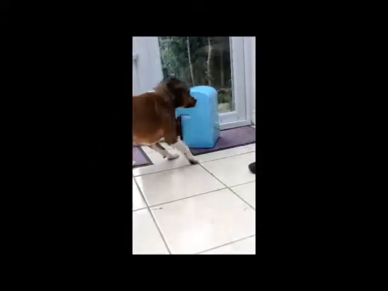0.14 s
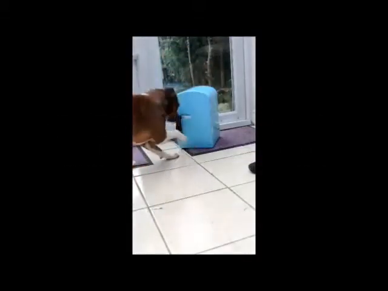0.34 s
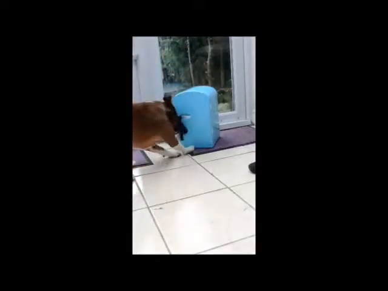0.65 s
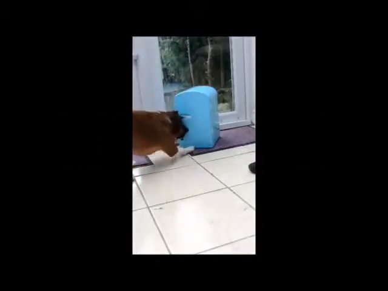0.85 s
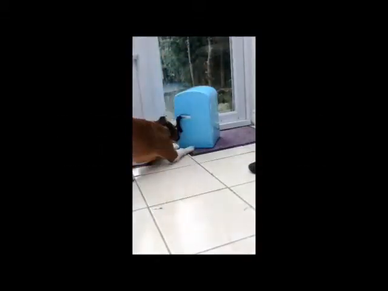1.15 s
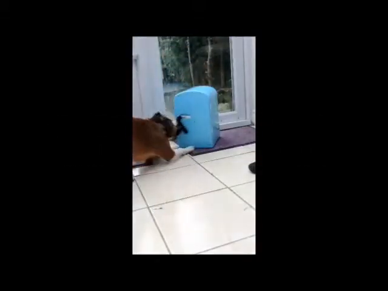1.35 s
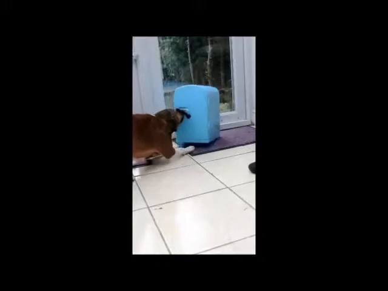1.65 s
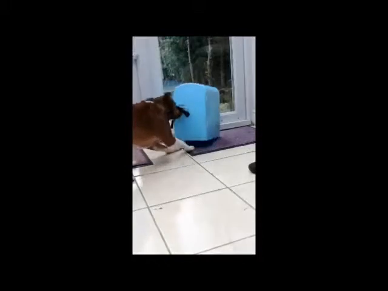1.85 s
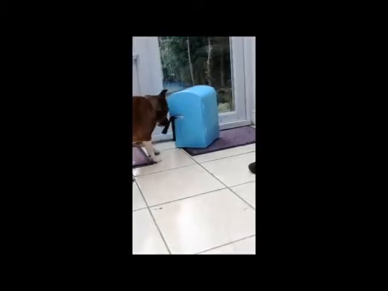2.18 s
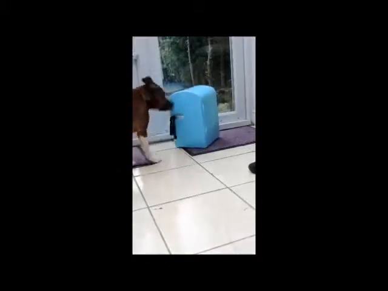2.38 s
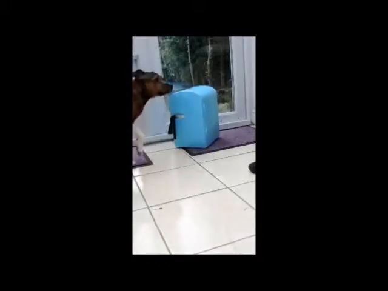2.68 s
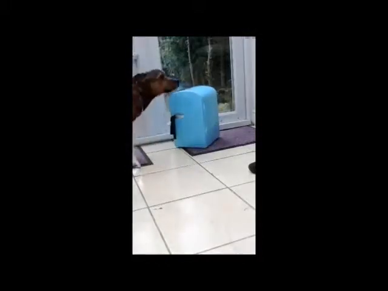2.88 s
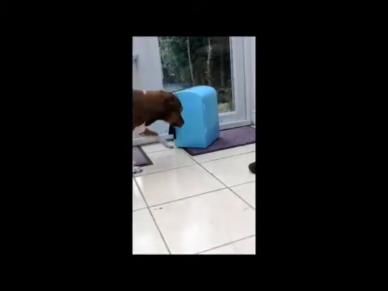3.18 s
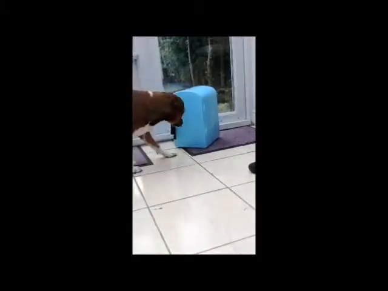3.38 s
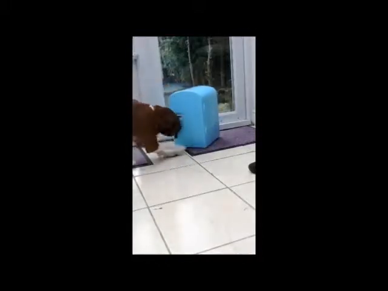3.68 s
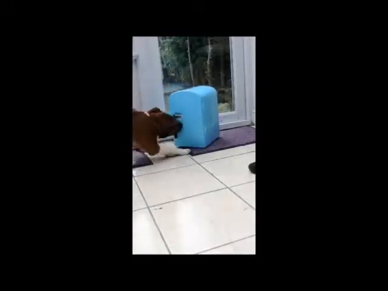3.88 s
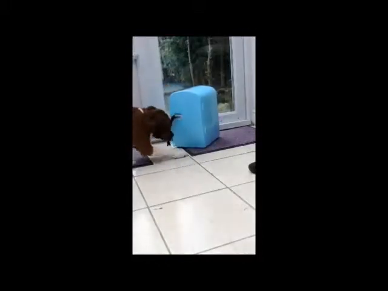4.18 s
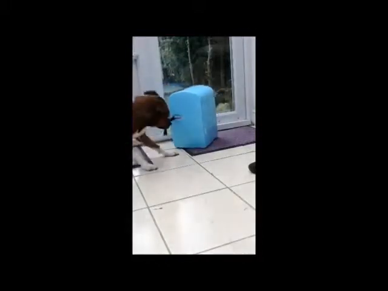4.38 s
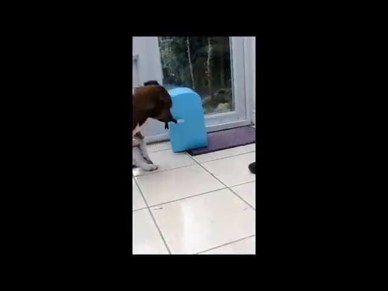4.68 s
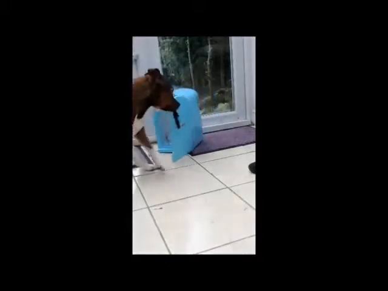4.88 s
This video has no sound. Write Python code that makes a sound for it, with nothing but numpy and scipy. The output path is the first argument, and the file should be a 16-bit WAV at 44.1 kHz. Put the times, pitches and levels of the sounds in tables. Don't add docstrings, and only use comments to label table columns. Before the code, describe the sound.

A dog's claws tick on kitchen tile as it tugs a hollow plastic box, which knocks sharply, rattles and finally jolts with loud clacks.

```python
import sys
import numpy as np
from scipy import signal
from scipy.io import wavfile
from scipy.ndimage import uniform_filter1d

SR = 44100
rng = np.random.default_rng(int(sys.argv[2]) if len(sys.argv) > 2 else 0)


def convert_level_to_amplitude(level_db):
    exponent = np.asarray(level_db, float) / 20
    return 10 ** exponent


def digitize_waveform(pressure):
    field = np.atleast_2d(pressure).T
    bounded = np.clip(field, -1, 1)
    quanta = np.round(bounded * 32767).astype(np.int16)
    wavfile.write(sys.argv[1], SR, quanta)


N = 221900

# t/s, strength level/dB, pitch
# f/Hz, # direct share level/dB
BROAD_BLOWS = [(.6551, -7, 1540, -3.5), (.658, -15.5, 685, -33), (.689, -2.5, 2350, -1.5),
               (.6883, -13, 8600, 11.5), (.876, -23, 1740, -17), (.875, -20, 7150, -10),
               (.893, -28.5, 590, -3.5), (1.02, -14, 1450, 2.5), (1.025, -4.5, 1750, -6.5),
               (1.0284, 0.5, 5570, -4), (1.629, -31, 1580, -2.5), (1.886, -26.5, 610, -14),
               (1.913, -28.5, 470, -11), (2.068, -29.5, 2040, -12), (2.074, -41, 800, -8),
               (2.154, -34, 665, -2), (4.485, -32, 1200, -10), (4.717, -27.5, 530, -25),
               (4.764, -9.5, 900, -6), (4.9375, -9, 5400, -3)]
# t/s, strength level/dB, panel f/Hz, direct share level/dB
PANEL_BLOWS = [(.9, -37.5, 264, 4), (1.034, -36, 595, -1.5), (1.938, -27.5, 870, -3.5),
               (1.941, -32.5, 2300, 1), (1.955, -36, 625, -4), (1.974, -28, 2120, -10),
               (2.615, -46.5, 600, -0.5), (4.766, -17.5, 117.2, -7), (4.774, -17.5, 410, -15),
               (4.808, -26, 1100, -3), (4.936, -5, 972, -1.5), (4.939, -11, 2300, -6),
               (4.952, -19.5, 1050, 1), (4.996, -26, 984, -7)]
# t/s, strength level/dB
BODY_JOLTS = [(0.6559, -38), (0.688, -33.5), (.876, -41.5), (.893, -37), (1.022, -35), (1.214, -40.5),
              (1.63, -45), (1.885, -38.5), (1.912, -65), (1.975, -42), (2.154, -34.5), (2.97, -50.5),
              (3.276, -41), (3.314, -42), (3.767, -42), (4.718, -50), (4.763, -18.5), (4.773, -15),
              (4.936, -27.5), (4.953, -48)]
# f/Hz, level/dB, t60/s
BODY_MODES = [(97.4, -1, 0.069), (122.6, 2.5, 0.083), (211.3, 1.5, .12), (272.6, 1, 0.16), (328, 2, 0.13),
              (402, 1.5, 0.099), (488, -7.5, 0.11)]


def cabinet():
    out = np.zeros((2, N))
    for blows, q_factor in ((BROAD_BLOWS, 0.92), (PANEL_BLOWS, 2.17)):
        for s, shell_db, shell_hz, direct_db in blows:
            force = contact(chatter_ms=8.7, chatter_db=-9.5)
            width_hz = shell_hz / q_factor
            shell = resonance(resonance(force, shell_hz, width_hz), shell_hz, width_hz)
            add(out, s, convert_level_to_amplitude(shell_db) * peak_one(shell) * convert_level_to_amplitude([[0], [direct_db]]))
    for s, body_db in BODY_JOLTS:
        body = ring(contact(chatter_ms=8.5, chatter_db=-13.5), BODY_MODES)
        add(out, s, convert_level_to_amplitude(body_db) * peak_one(body))
    return out


# t/s, held t/s, level/dB
SHAKES_OF_CONTENTS = [(.056, .008, -49), (.224, .008, -46.5), (.34, 0.056, -54), (1.224, 0.0054, -44),
                      (1.632, 0.0057, -41.5), (1.766, 0.0055, -41.5), (1.9, 0.058, -38.5),
                      (1.98, 0.031, -49), (2.07, 0.018, -41.5), (2.162, 0.0049, -37), (2.3, 0.24, -51.5),
                      (2.55, 0.096, -50), (2.7, .03, -62), (3.2, .03, -52), (3.776, 0.0041, -43),
                      (4.138, .05, -57), (4.496, 0.13, -50.5), (4.64, 0.067, -47.5), (4.715, 0.0094, -35.5),
                      (4.8, 0.022, -32)]
# t/s, held t/s, level/dB
ROCKS_ON_FEET = [(.001, 0.19, -57), (.34, 0.038, -51), (.6, .04, -49), (1.22, .015, -40.5),
                 (1.6, 0.048, -68.5), (1.808, .015, -47), (1.916, 0.0041, -34), (1.96, 0.28, -52),
                 (2.25, 0.22, -49), (2.72, .012, -56), (2.93, 0.066, -57), (3.26, .07, -51),
                 (3.776, 0.0055, -41.5), (4.14, .012, -69), (4.406, .008, -49.5), (4.496, 0.01, -48),
                 (4.712, 0.0086, -34), (4.81, .02, -31)]
# f/Hz, level/dB, t60/s
SHELL_MODES = [(590, -3, 0.019), (907, 4.5, 0.0081), (1200, 9.5, 0.0043)]
# f/Hz, level/dB, t60/s
EDGE_MODES = [(1880, -14, 0.0044), (2200, 6, 0.0015), (3340, 7.5, 0.0038), (3730, 15, 0.0012),
              (5170, 14.5, 0.00063)]


def rattle():
    knocking = grains(per_s=600, spread_db=3)
    knocking = signal.sosfilt(signal.butter(4, 3000, fs=SR, output="sos"), knocking)
    shell = rms_one(ring(knocking, SHELL_MODES))
    edge = rms_one(ring(knocking, EDGE_MODES[:2]))
    touches = rms_one(shell + convert_level_to_amplitude(-4) * edge)
    rocking = rms_one(ring(grains(per_s=300, spread_db=3), BODY_MODES))
    shake_gain = bursts(SHAKES_OF_CONTENTS, rise_db_per_s=798, fall_db_per_s=253, extra_db=-7)
    rock_gain = bursts(ROCKS_ON_FEET, rise_db_per_s=600, fall_db_per_s=337, extra_db=-11)
    return shake_gain * touches + rock_gain * rocking


# t/s, held t/s, hiss level/dB, grind level/dB relative to the hiss
SLIDING_STROKES = [(0.514, 0.0048, -41.5, -4), (.635, 0.02, -49, -14), (1.23, .012, -45, -3),
                   (1.63, 0.16, -49.5, -1), (1.79, 0.013, -49, -3), (1.96, 0.0087, -43, -11),
                   (2.137, .015, -43, 1.5), (2.25, 0.12, -42.5, -6), (2.455, 0.04, -49.5, 3.5),
                   (2.68, .06, -49, -6), (2.85, 0.014, -48, -3), (2.985, .008, -47.5, 2),
                   (3.11, 0.023, -48.5, -5), (3.655, 0.036, -42.5, -5.5), (3.86, 0.019, -45, -2.5),
                   (3.99, .03, -48.5, 1), (4.285, 0.021, -37.5, -15), (4.37, 0.079, -35.5, -13.5),
                   (4.495, 0.059, -37, -8), (4.59, 0.027, -32.5, -4.5), (4.645, 0.046, -36.5, -5),
                   (4.73, 0.029, -33, -1.5), (4.92, 0.015, -34, -20), (4.94, .1, -29.5, -4)]
# lower f/Hz, upper f/Hz
FRICTION_BANDS = [(5400, 9600), (8800, 13800)]


def slide():
    slips = grains(per_s=5300, spread_db=3.5)
    hiss, dust = (rms_one(band_pass(slips, band)) for band in FRICTION_BANDS)
    grind = rms_one(ring(grains(per_s=4000, spread_db=2.5), EDGE_MODES[1:]))
    rates = (311, 313)
    grind_db = np.array(SLIDING_STROKES)[:, 3:]
    dust_db = -2 - 0.23 * grind_db
    friction = bursts(SLIDING_STROKES, *rates) * hiss
    friction = friction + bursts(SLIDING_STROKES, *rates, grind_db) * grind
    friction = friction + bursts(SLIDING_STROKES, *rates, dust_db) * dust
    return convert_level_to_amplitude(-4.5 + 2.4 * drift(25)) * friction


# t/s, tip level/dB, tile level/dB, left-right pan level/dB, room share level/dB
CLAW_TOUCHES = [(0.0529, -12, -33, 5.5, 0.5), (0.2176, -22.5, -37.5, 7, 7), (0.514, -33.5, -39, 11, -8),
                (0.6888, -20.5, -47, -25, 14), (1.9024, -33, -45, 5, 5), (2.2006, -6, -27.5, 5, -3),
                (3.025, -20, -32, 5, 0.5), (3.3562, -27, -45, 1, -5), (3.652, -32.5, -40, -13, 1.5),
                (3.6963, -27, -55, 1.0, -12), (3.7066, -42, -46.5, -1.0, 9), (3.836, -30.5, -45, 3, 6.5),
                (4.586, -27.5, -37.5, 0.5, 10)]


def claws():
    direct, to_room = np.zeros((2, N)), np.zeros(N)
    for s, tip_db, tile_db, pan_db, room_db in CLAW_TOUCHES:
        force = contact(chatter_ms=1.6, chatter_db=3)
        tip = peak_one(band_pass(force, (6370, 13020)))
        tile = peak_one(band_pass(force, (2300, 6020)))
        tick = convert_level_to_amplitude(tip_db - 1.0) * tip + convert_level_to_amplitude(tile_db + 5.5) * tile
        add(direct, s, tick[1] * convert_level_to_amplitude([[pan_db / 2], [-pan_db / 2]]))
        add(to_room, s, tick[0] * convert_level_to_amplitude(room_db + 10.0))
    return direct, to_room


# t/s, held t/s, airflow level/dB, nostril resonance at the start f/Hz
NOSE_SNIFFS = [
    (1.264, 0.019, -47, 3720),
    (1.461, 0.0079, -41, 4850),
    (1.54, .012, -49.5, 3950),
    (2.7, 0.042, -41, 4650),
    (2.979, .008, -36.5, 3300),
    (3.029, 0.027, -40.5, 3500),
    (3.639, 0.018, -43, 3270),
    (3.995, .06, -44, 3930),
]


def sniffs():
    rest_hz, relax_s = 3706, .09
    whistle_hz, broad_hz = 3170, 4430
    narrow, wide = (low_noise_pair(half_width_hz) for half_width_hz in (200, 850))
    t = np.arange(N) / SR
    rows = np.array(NOSE_SNIFFS)
    current = np.maximum(np.searchsorted(rows[:, 0], t + .04) - 1, 0)
    s, held, db, start_hz = rows[current].T
    share = np.clip((start_hz - whistle_hz) / (broad_hz - whistle_hz), 0, 1) ** 2
    breath = np.sqrt(1 - share) * narrow + np.sqrt(share) * wide
    hz = rest_hz + (start_hz - rest_hz) * np.exp(-np.maximum(t - s, 0) / relax_s)
    phase = 2 * np.pi * np.cumsum(hz) / SR
    flow = bursts(NOSE_SNIFFS, rise_db_per_s=500, fall_db_per_s=236, extra_db=-7.5)
    return flow * (breath[0] * np.cos(phase) + breath[1] * np.sin(phase))


# f/Hz, t60/s
REVERB_TIME = [(100, 0.15), (300, 0.31), (1000, 0.39), (4000, 0.41), (12000, 0.23)]
# f/Hz, likeness/1
ECHO_LIKENESS = [(30, .6), (70, 0.88), (300, 0.96), (600, 0.9), (1200, 0.39), (2500, 0.21), (5000, 0.019),
                 (12000, 0.027)]
# f/Hz, level/dB
ECHO_COLOUR = [(100, -8), (270, -5.5), (450, 1), (1000, -1), (12000, 1.5)]


def kitchen(x, build_s):
    t = np.arange(SR // 2) / SR

    def decay(hz):
        return convert_level_to_amplitude(at_hz(ECHO_COLOUR, hz) - 60 * t / at_hz(REVERB_TIME, hz))

    echoes = bands(len(t), ECHO_LIKENESS, decay)
    echoes = echoes * (1 - np.exp(-(t / build_s) ** 2))
    echoes = echoes / np.sqrt(np.sum(echoes ** 2) / 2)
    return convert_level_to_amplitude(-1) * signal.fftconvolve(x[None], echoes, axes=1)[:, :N]


# f/Hz, level/dB per Hz
AIR_SPECTRUM = [(14, -30), (22, 2.5), (70, -3.5), (140, -2.5), (330, 0.5), (540, 0.5), (900, -1.5),
                (1300, -2.5), (1900, -7), (2600, -6.5), (4200, -4), (6000, -7.5), (12000, -8.5),
                (15200, -14)]
# f/Hz, likeness/1
AIR_LIKENESS = [(60, 0.32), (180, 0.19), (550, 0.25), (1650, 0.028), (4970, 0.014), (15000, 0.04)]
# f/Hz, rms level/dB
COMPRESSOR_LINES = [(98, -65), (197, -68.5), (1180, -63.5)]


def background():
    together = drift(3.65)

    def air_gain(hz):
        patchy_db = 2.8 * min(1, (1500 / hz) ** .4) * drift(13)
        return convert_level_to_amplitude(at_hz(AIR_SPECTRUM, hz) + 1.0 * together + patchy_db)

    air = rms_one(bands(N, AIR_LIKENESS, air_gain))
    t = np.arange(N) / SR
    hum = 0
    for hz, db in COMPRESSOR_LINES:
        level = convert_level_to_amplitude(db + 0.5 + 2.1 * drift(4.68))
        hum = hum + level * np.sin(2 * np.pi * hz * t + 1.63 * drift(29))
    return convert_level_to_amplitude(-46) * air + hum


def contact(chatter_ms, chatter_db):
    t_ms = np.arange(8000) / SR * 1000
    chatter = rng.standard_normal(8000) * (rng.random(8000) < .08)
    chatter = chatter * np.exp(-t_ms / max(chatter_ms, .1))
    touch = 1. * (t_ms == 0)
    return np.array([touch, touch + convert_level_to_amplitude(chatter_db) * chatter])


def grains(per_s, spread_db):
    sizes = convert_level_to_amplitude(spread_db * np.minimum(rng.exponential(1, N), 5)) * rng.choice([-1, 1], N)
    return rms_one(sizes * (rng.random(N) < per_s / SR))


def resonance(x, hz, width_hz):
    r = np.exp(-np.pi * width_hz / SR)
    poles = [1, -2 * r * np.cos(2 * np.pi * hz / SR), r * r]
    return signal.lfilter([(1 - r * r) / 2, 0, (r * r - 1) / 2], poles, x + 1e-18)


def ring(force, modes):
    out = 0
    for k, (hz, level_db, t60) in enumerate(modes):
        width_hz = np.log(1000) / np.pi / t60
        out = out + (-1) ** k * convert_level_to_amplitude(level_db) * resonance(force, hz, width_hz) / width_hz
    return out


def bursts(rows, rise_db_per_s, fall_db_per_s, extra_db=0):
    t = np.arange(0, N + 50, 50) / SR
    s, held, db = (np.array(rows)[:, k, None] for k in range(3))
    before, after = np.maximum(s - t, 0), np.maximum(t - s - held, 0)
    db = db + extra_db - rise_db_per_s * before - fall_db_per_s * after
    gain = np.sqrt(np.sum(convert_level_to_amplitude(db) ** 2, axis=0))
    return uniform_filter1d(np.interp(np.arange(N) / SR, t, gain), size=300)


def drift(rate):
    knots = rng.standard_normal(int(N / SR * 40) + 3)
    return np.interp(np.arange(N) / SR * np.clip(rate, .1, 39), np.arange(len(knots)), knots)


EDGES_HZ = 22 * 2 ** np.arange(0, 9.6, .5)


def bands(length, likeness, shape):
    out, white = 0, rng.standard_normal((2, 2, length))
    for k, (low, high) in enumerate(zip(EDGES_HZ, EDGES_HZ[1:])):
        band = signal.butter(2, [low, high], "band", fs=SR, output="sos")
        mid, side = signal.sosfilt(band, white[k % 2])
        hz = np.sqrt(low * high)
        alike = np.clip(at_hz(likeness, hz), 0, 1)
        out = out + shape(hz) * (np.sqrt(1 + alike) * mid + np.sqrt(1 - alike) * side * [[1], [-1]])
    return out


def low_noise_pair(cutoff_hz):
    low_pass = signal.butter(2, cutoff_hz, fs=SR, output="sos")
    return rms_one(signal.sosfilt(low_pass, rng.standard_normal((2, N))))


def band_pass(x, band_hz):
    return signal.sosfilt(signal.butter(3, band_hz, "band", fs=SR, output="sos"), x)


def at_hz(points, hz):
    return np.interp(np.log(hz), np.log(np.array(points)[:, 0]), np.array(points)[:, 1])


def rms_one(x):
    return x / np.sqrt(np.mean(x ** 2) + 1e-20)


def peak_one(x):
    return x / np.abs(x[0]).max()


def add(track, s, sound):
    i = round(s * SR)
    track[..., i:i + sound.shape[-1]] += sound[..., :N - i]


def scene():
    fridge_to_room, fridge = cabinet() + rattle()
    ticks, ticks_to_room = claws()
    soft = slide() + sniffs()
    direct = ticks + convert_level_to_amplitude(3.5) * fridge * convert_level_to_amplitude([[-.7], [.7]]) + soft
    wall_echoes = convert_level_to_amplitude(5.5) * kitchen(fridge_to_room, build_s=0.0026)
    floor_echoes = kitchen(ticks_to_room + convert_level_to_amplitude(3.0) * soft, build_s=.014)
    return direct + wall_echoes + floor_echoes + background()


def top_cut(x):
    return signal.sosfilt(signal.butter(12, 16650, fs=SR, output="sos"), x)


def record(dry):
    coloured = dry - .45 * resonance(dry, hz=5800, width_hz=1500)
    cut = signal.sosfilt(signal.cheby2(16, 50, 15350, fs=SR, output="sos"), coloured)
    ceiling = .95
    mix = ceiling * np.tanh(cut / ceiling)
    return top_cut(mix)


dry = scene()
out = record(dry)
digitize_waveform(out)
```